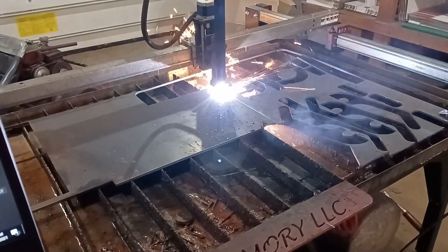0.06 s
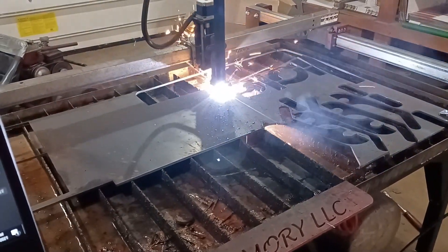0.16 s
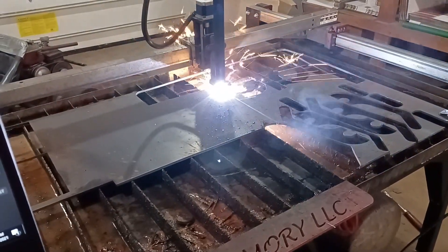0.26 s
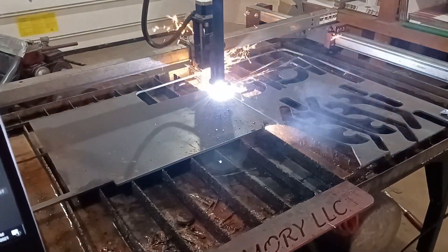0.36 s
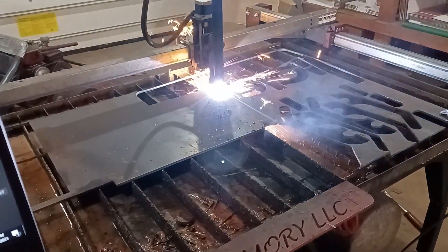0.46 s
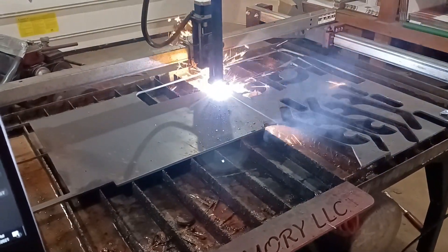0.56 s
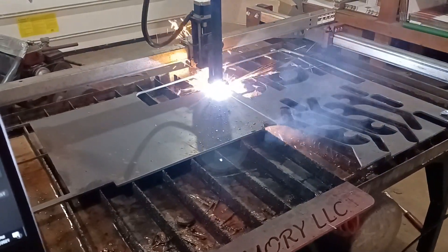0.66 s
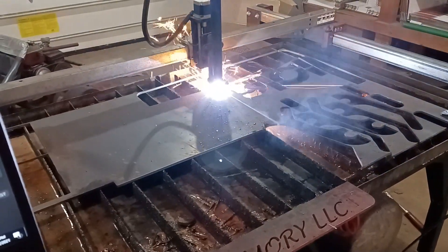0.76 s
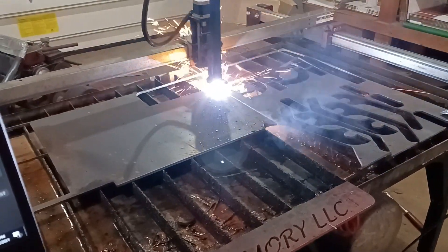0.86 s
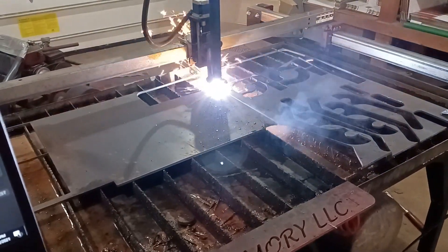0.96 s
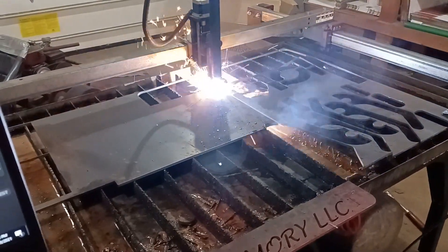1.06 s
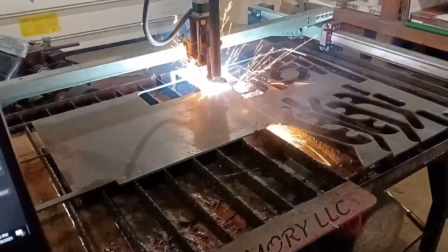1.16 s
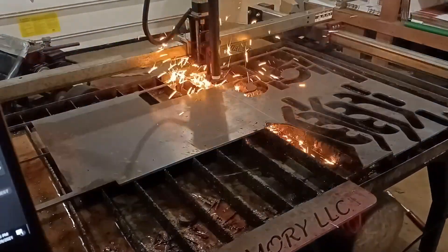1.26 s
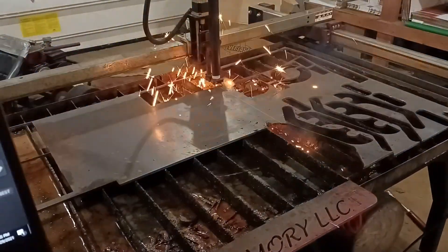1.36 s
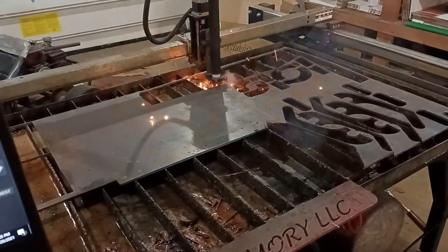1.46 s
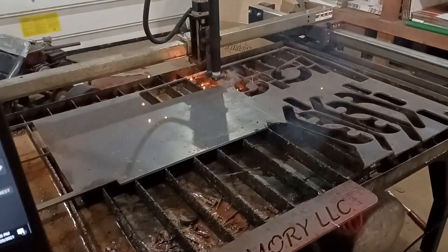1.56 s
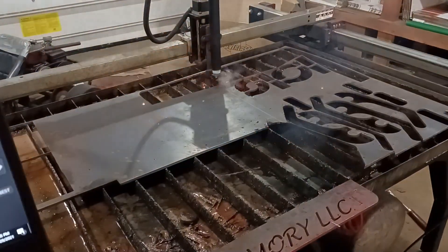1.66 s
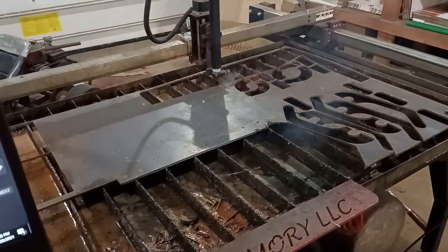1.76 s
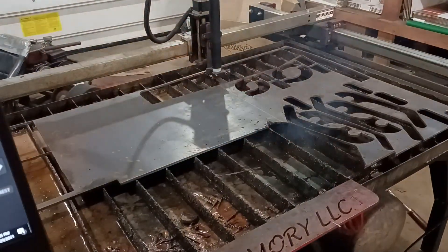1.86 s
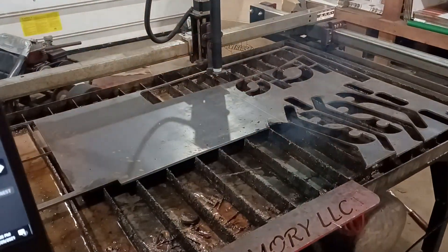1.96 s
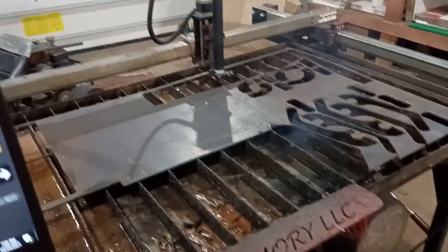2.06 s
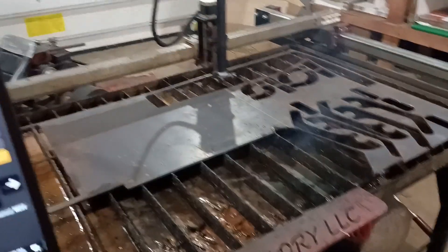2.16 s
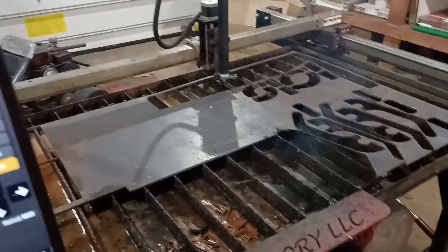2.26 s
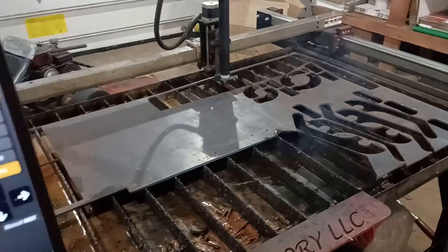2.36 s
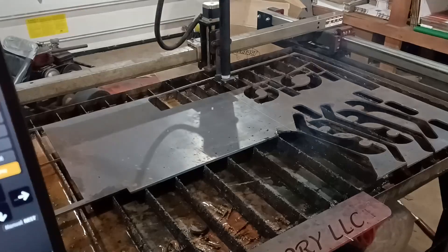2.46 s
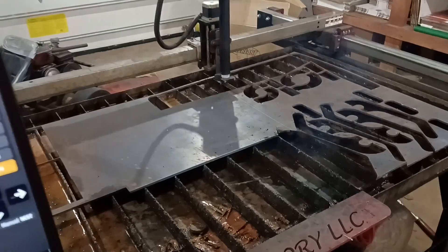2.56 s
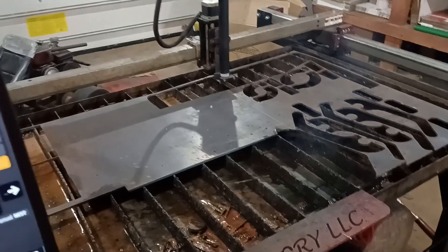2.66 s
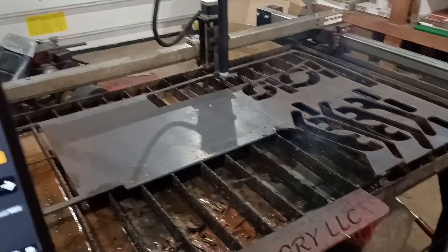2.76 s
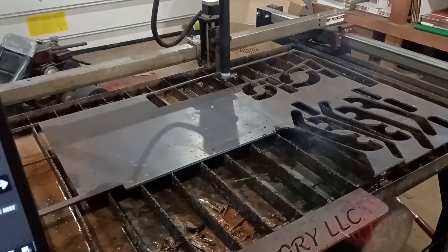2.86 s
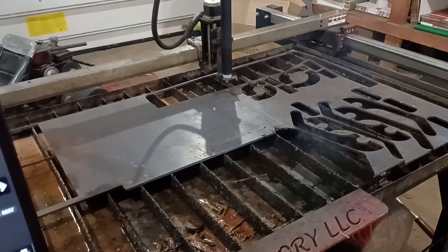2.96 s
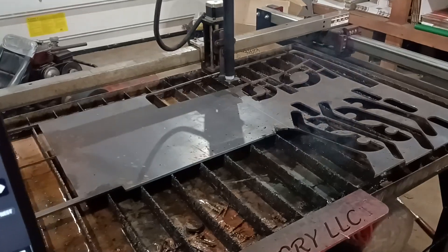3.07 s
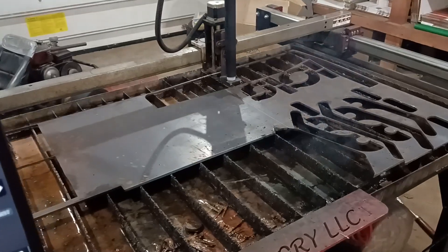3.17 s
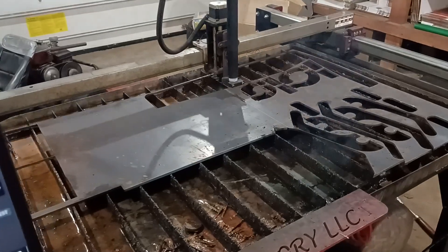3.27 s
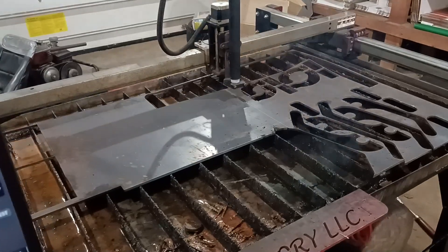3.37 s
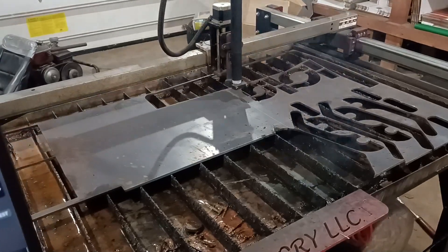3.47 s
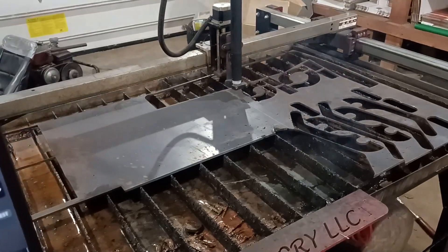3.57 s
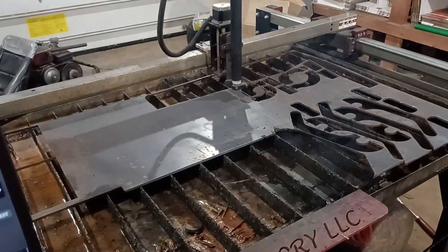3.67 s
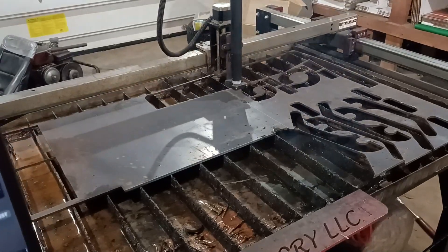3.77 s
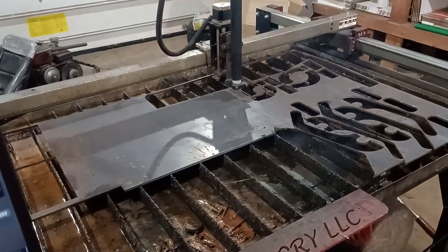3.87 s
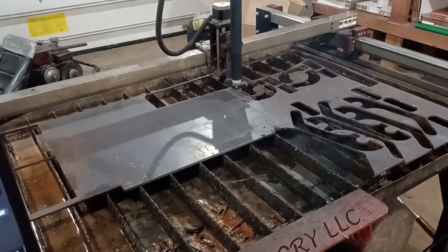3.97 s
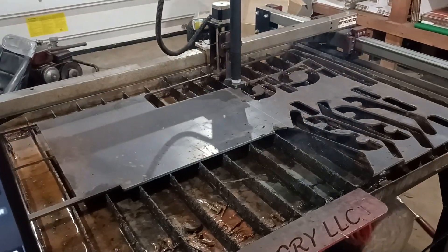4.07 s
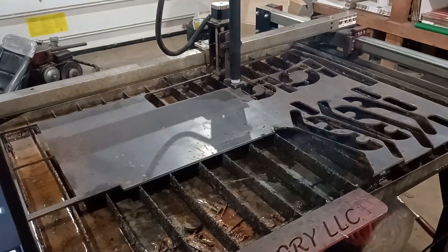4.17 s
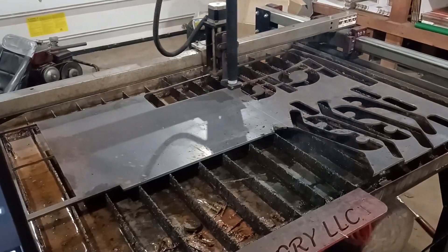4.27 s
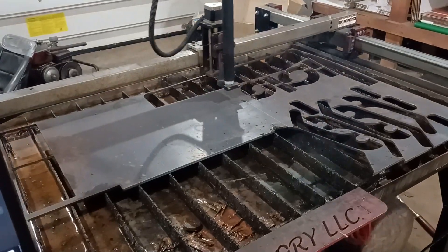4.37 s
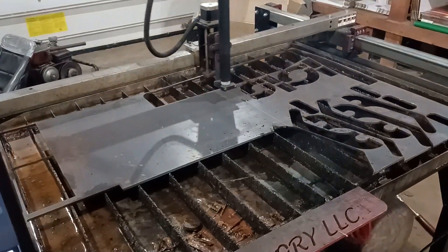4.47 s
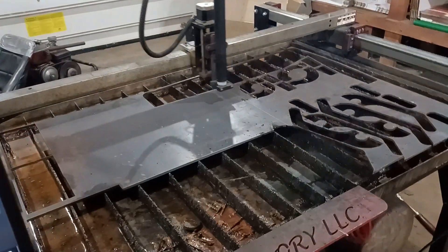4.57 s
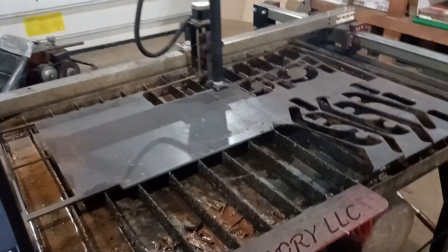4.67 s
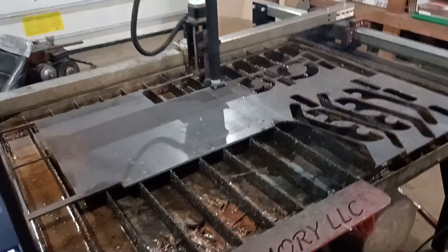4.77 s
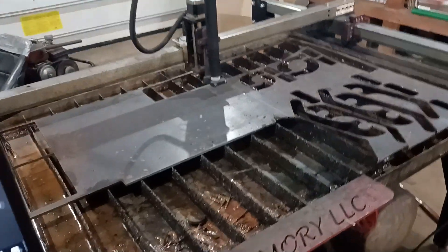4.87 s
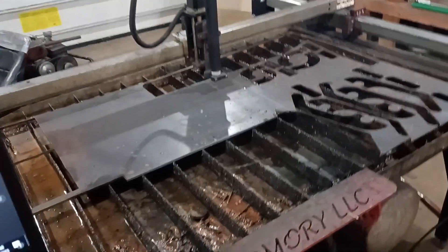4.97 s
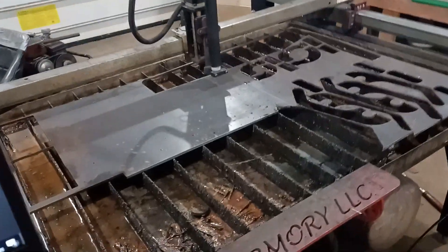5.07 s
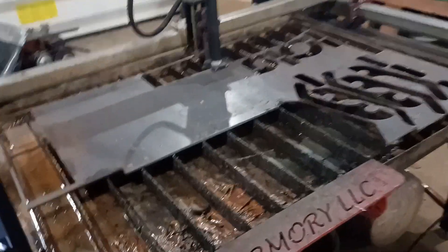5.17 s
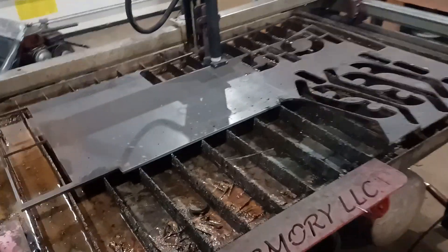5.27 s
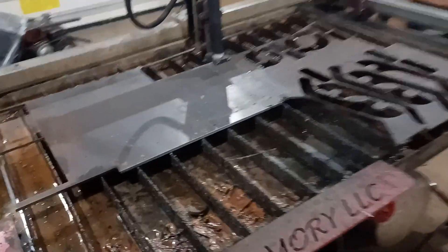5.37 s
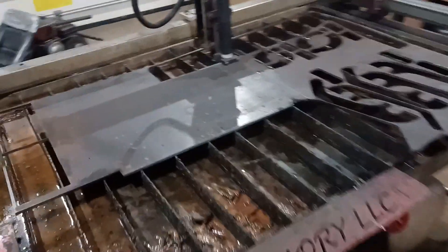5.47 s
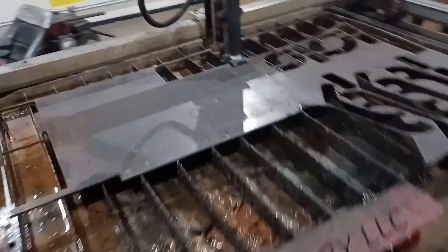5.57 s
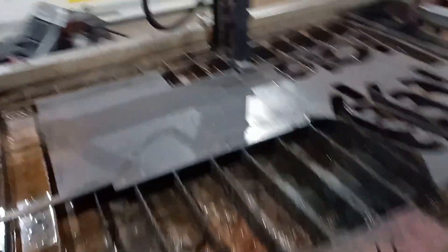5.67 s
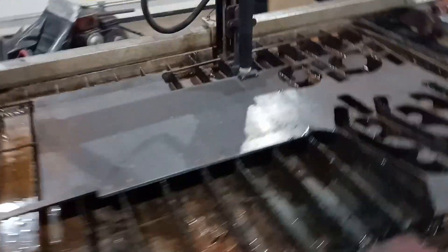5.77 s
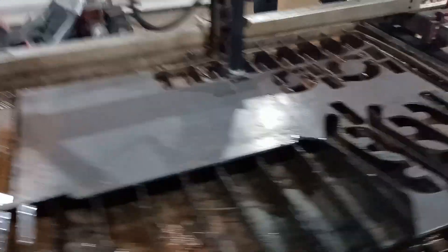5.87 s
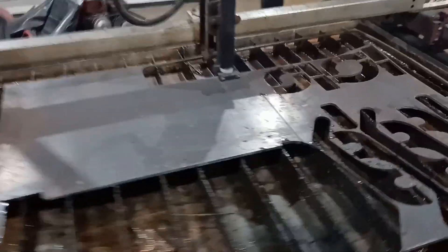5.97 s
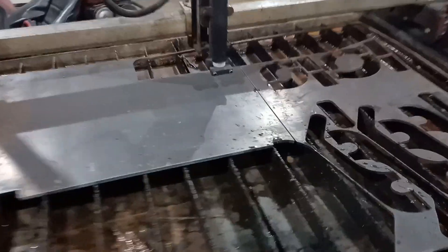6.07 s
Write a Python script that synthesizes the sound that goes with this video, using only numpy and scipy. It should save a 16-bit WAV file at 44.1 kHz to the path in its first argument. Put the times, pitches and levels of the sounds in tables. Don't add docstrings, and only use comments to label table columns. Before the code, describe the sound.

Fierce broad arc hiss on steel plate ends in a sharp pop and rattle, leaving steady cooling-air hiss, low fan drone and rumbling machine travel.

```python
import sys
import numpy as np
from scipy import signal
from scipy.fft import rfft, irfft, next_fast_len
from scipy.io import wavfile
from scipy.ndimage import uniform_filter1d

SR = 44100
rng = np.random.default_rng(int(sys.argv[2]) if len(sys.argv) > 2 else 0)


def volts(x):
    e = np.asarray(x, float) / 20
    return 10 ** e


def waveform_to_disk(signal):
    frames = np.transpose(np.atleast_2d(signal))
    scaled = np.clip(frames, -1, 1) * 32767
    samples = np.round(scaled).astype(np.int16)
    wavfile.write(sys.argv[1], SR, samples)


N = 269451
TIME = np.arange(N) / SR
BLOCK = 1024
HZ = np.maximum(np.fft.rfftfreq(BLOCK, 1 / SR), 10)[:, None]

# pitch_hz, level_db
RUMBLE_COLOUR = [(20, -34), (45, -35), (62, -32), (78, -26), (90, -15), (125, -9), (170, -3.5), (225, -1),
                 (290, -4.5), (335, -6), (400, -14.5), (460, -16.5), (560, -15), (900, -29)]
RUMBLE_DB, RUMBLE_ARC_DB, RUMBLE_TRAVERSE_DB = -41, 1.5, 0.75
BLADE_HZ, LOADED_BLADE_HZ, SPIN_UP_S = 270.0, 267.4, .2
BLADE_DB, BLADE_WAVER_DB = -31.5, 1
SAG_S, SAG_LENGTH_S, SAG_DB = 1.154, 0.032, -8

# pitch_hz, width_hz, lift_db
ROOM_RINGS = [(535, 34, 2), (914, 9.7, -1), (970, 7.3, 0), (1142, 11, 3), (1400, 34, 2.5), (1626, 16, 2.5),
              (1840, 19, 3.5)]
ROOM_T60_S, ROOM_DB = 0.26, -7

# start_s, end_s, pitch_hz, level_db, swell_db (change by the end)
WHINES = [
    (.76, 1.19, 1790, -45.5, 6),
    (4.31, 4.82, 1991, -45, 1.5),
    (3.0, 6.0, 157, -45, -2),
]
FLUTTER_HZ, FLUTTER_CREST_S = 20.2, 4.738

# time_s, length_s, pitch_hz, glide_hz_per_s, level_db
JOLTS = [
    (1.15, 0.027, 2600, 0, -34),
    (1.17, 0.035, 4620, 0, -28.5),
    (1.699, 0.093, 1650, -1, -48),
    (2.866, 0.097, 1306, 3996, -38),
    (2.906, 0.027, 3720, 0, -39),
    (4.213, .04, 2760, 0, -41),
    (4.785, .018, 1616, -14000, -43),
]
JOLT_WIDTH_SHARE = 0.23

# start_s, end_s, roar_db, upper_db (upper frame rings, relative)
MOVES = [
    (1.21, 1.955, -42.5, -1.5),
    (1.5, 3.097, -36, -18.5),
    (2.794, 4.592, -35.5, -5.5),
]
SPEED_UP_S, SLOW_DOWN_S, MOVE_SWELL_DB_PER_S = 0.17, 0.35, 1.1
KICK_S, KICK_LENGTH_S, KICK_DB = 2.875, 0.031, 8
# pitch_hz, width_hz, level_db
FRAME_LOWER = [(903, 280, 2.5), (1150, 59, 3.5), (1456, 58, 0.5), (1650, 180, 2.5), (1840, 440, -5.5)]
FRAME_UPPER = [(2600, 670, 0), (2740, 83, -1), (3930, 370, -3)]

# time_s, strength_db, facing (how squarely the microphones face it, about 0-1)
AIR = [(1.2, 3, 0), (1.35, -2.5, 0.6), (1.7, -0.6, 0.36), (2.1, -1, .8), (2.4, -0.5, 0.94), (2.65, 0, 1.05),
       (2.9, 0, .6), (3.5, 0.1, 1), (4.2, 0.1, .9), (4.7, -1.5, 0.45), (5.15, -3, 1.1), (5.3, -.6, .3),
       (5.7, 1.5, 1), (5.85, 0.8, .8), (5.95, 3.5, 0.9), (6.11, 2.2, .8)]
# pitch_hz, level_db
AIR_COLOUR = [(150, -44), (550, -9), (1500, -12.5), (3000, -9.5), (4200, -6.5), (5800, -3), (7000, -1),
              (7600, -5), (8200, -8.5), (9500, -9), (10500, -9), (12000, -6), (13500, -4), (15800, -4.5)]
JET_DB, TOP_DB = -33.5, 5
NOZZLE_HZ, SLIDE_FROM_S, SLIDE_HZ_PER_S = 7050, 5.7, -2600
BOOST_DB, BOOST_PER_DB = 1.4, 1.47

# time_s, level_db
ARC = [
    (0, -27),
    (.4, -25.5),
    (.85, -27.5),
    (.97, -25),
    (1.12, -24.5),
    (1.14, -21.5),
    (1.2, -25.5),
    (1.26, -31.5),
    (1.34, -43),
]
# pitch_hz, level_db
ARC_COLOUR = [(150, -18), (500, -10), (1000, -6.5), (1400, -9), (2100, -9), (3000, -5.5), (4500, -5),
              (5800, -4.5), (7300, -7), (7900, -11.5), (10000, -9), (10700, -5), (12200, -2), (15800, -1.5)]
SIZZLE_DB, SIZZLE_PER_DB = 0.5, -0.07

POP_S, POP_DB, THUMP_DB, POP_TAIL_DB = 1.1920, -8.5, -13.5, -22.5
# pitch_hz, level_db
POP_TAIL_COLOUR = [(24, -46), (40, -29), (112, 0), (376, 0.5), (733, -6), (1130, -6), (1510, -12),
                   (2170, -7.5), (3000, -24), (3900, -47), (6600, -120)]

# pitch_hz, likeness (0-1)
LIKENESS = [(25, 0.4), (70, 0.97), (130, 0.95), (300, 0.86), (550, 0.45), (1000, 0.38), (2700, 0.43),
            (5300, 0.47), (7200, 0.55), (8300, 0.55), (9700, 0.05), (12000, 0.5), (13300, 0.25),
            (15000, 0.3)]
# pitch_hz, difference_db
LEAN = [(60, 0.5), (600, -0.4), (1400, 2.5), (2000, 0.5), (2500, 2.5), (4000, -1.5), (5500, -2.1),
        (7000, 1), (8500, 0), (9500, -2.5), (11500, -4.5), (13300, -5), (14300, -.6), (16000, -1.1)]
# time_s, right_lag_us (right microphone's delay in microseconds)
LAG = [
    (0, 30),
    (1.1, 30),
    (1.9, 22),
    (3.0, 9),
    (4.2, 9),
    (4.7, 45),
    (5.3, 50),
    (5.6, -5),
    (6.11, -8),
]
DUCK_DB, RECOVER_FROM_S, RECOVER_TO_S = -6, 2.31, 2.8
TOP_CUT_HZ = 15745


def columns(rows, t):
    s, *values = np.transpose(rows)
    return [np.interp(t, s, v) for v in values]


def at_hz(points, wanted_hz=HZ):
    hz, value = np.transpose(points)
    return np.interp(np.log(wanted_hz), np.log(np.maximum(hz, 10)), value)


def gate(start, end, rise, fall):
    return np.clip((TIME - start) / rise, 0, 1) * np.clip((end - TIME) / fall, 0, 1)


def bump(t, centre, length):
    return np.exp(-.5 * ((t - centre) / length) ** 2)


def drift(per_s, rows=1):
    width = max(1, round(SR / 256 / per_s / 2))
    white = rng.standard_normal((rows, N // 256 + 200))
    smooth = uniform_filter1d(uniform_filter1d(white, width), width)[:, 100:]
    return smooth / smooth.std()


def wobble(per_s):
    return np.interp(np.arange(N) / 256, np.arange(N // 256 + 100), drift(per_s)[0])


def rings(table):
    return sum(volts(2 * db) / (1 + (2 * (HZ - hz) / width) ** 2) for hz, width, db in table)


def air_noise(power, low_hz, high_hz, gust_db, patch_db, direct=1.0):
    white = rng.standard_normal((3, N))
    _, t, (shared, left, right) = signal.stft(white, SR, nperseg=BLOCK, noverlap=768)
    shape = np.sqrt(power(t)) * np.ones(shared.shape)
    inside = (HZ[:, 0] > low_hz) & (HZ[:, 0] < high_hz)
    shape = shape / np.sqrt(np.sum(shape[inside] ** 2, 0) / len(HZ))
    band = (3 * np.log2(HZ[:, 0] / 10)).astype(int)
    flicker = gust_db * drift(8.7) + patch_db * drift(10, rows=40)[band]
    alike = np.clip(direct * at_hz(LIKENESS), 0, .99)
    lean = volts(at_hz(LEAN) / 2)
    late = np.exp(-2j * np.pi * HZ * columns(LAG, t)[0] * 1e-6)
    shape = shape * volts(flicker[:, :len(t)]) * np.sqrt(2 / (1 + alike * late.real))
    shared, diffuse = np.sqrt(alike) * shared, np.sqrt(1 - alike)
    left = shape * lean * (shared + diffuse * left)
    right = shape / lean * (shared * late + diffuse * right)
    return signal.istft(np.array([left, right]), SR, nperseg=BLOCK, noverlap=768)[1][:, :N]


def moving(t, start, end):
    return np.clip((t - start) / SPEED_UP_S, 0, 1) * np.clip((end - t) / SLOW_DOWN_S, 0, 1) ** 2


def workshop(x):
    size = next_fast_len(N + SR)
    hz = np.fft.rfftfreq(size, 1 / SR)
    t = np.arange(SR // 2) / SR
    echoes = rng.standard_normal(len(t)) * volts(-60 * t / ROOM_T60_S) * (t > .004)
    echoes = echoes / np.linalg.norm(echoes)
    response = 1 + volts(ROOM_DB) * rfft(echoes, size) / (1 + hz / 6000)
    lift_db = sum(db / (1 + (2 * (hz - ring_hz) / width) ** 2) for ring_hz, width, db in ROOM_RINGS)
    return irfft(rfft(x, size) * response * volts(lift_db - 0.6), size)[:, :N]


def fan():
    flat = air_noise(lambda t: 1 / (1 + (HZ / 1200) ** 6), 90, 240, 0.74, 0.63)
    hz = np.maximum(np.fft.rfftfreq(N + 1, 1 / SR), 1)
    colour = volts(at_hz(RUMBLE_COLOUR, hz) + 5.0)
    traverse_start, traverse_end = MOVES[-1][:2]
    level_db = RUMBLE_DB + RUMBLE_ARC_DB * gate(-1, 1.4, .01, 0.23)
    level_db = level_db + RUMBLE_TRAVERSE_DB * moving(TIME, traverse_start, traverse_end)
    return volts(level_db) * irfft(rfft(flat, N + 1) * colour, N + 1)[:, :N]


def fan_tone():
    spin_up = np.exp(-np.maximum(TIME - SAG_S, 0) / SPIN_UP_S)
    hz = BLADE_HZ + (LOADED_BLADE_HZ - BLADE_HZ) * spin_up
    phase = 2 * np.pi * np.cumsum(hz + 0.325 * wobble(7.9)) / SR
    level_db = BLADE_DB + SAG_DB * bump(TIME, SAG_S, SAG_LENGTH_S) + BLADE_WAVER_DB * wobble(6.3)
    tone = np.sqrt(2) * volts(level_db) * (np.sin(phase) + volts(-31) * np.sin(2 * phase))
    return tone * volts([[.55], [-.55]])


def motors():
    out = np.zeros(N)
    for start, end, hz, db, swell_db in WHINES:
        progress = (TIME - start) / (end - start)
        flutter_phase = 2 * np.pi * FLUTTER_HZ * (TIME - FLUTTER_CREST_S) + .25 * wobble(4)
        flutter = 1 + .7 * np.clip(progress, .6, 1) * np.cos(flutter_phase)
        phase = 2 * np.pi * np.cumsum(hz * (1 + .0015 * wobble(9))) / SR
        level_db = db + 3 + swell_db * progress + 1.2 * wobble(6)
        out += volts(level_db) * gate(start, end, .025, .04) * flutter * np.sin(phase)
    return out


def jolts():
    out = 0
    for s, length, hz, glide, db in JOLTS:
        start, end = int(s * SR) - SR // 6, int(s * SR) + SR // 6
        t = TIME[start:end] - s
        low_pass = signal.butter(2, JOLT_WIDTH_SHARE * hz / 2, fs=SR, output="sos")
        band = signal.sosfilt(low_pass, rng.standard_normal((2, len(t))))
        phase = 2 * np.pi * (hz * t + glide * t ** 2 / 2)
        rattle = (band[0] * np.cos(phase) + band[1] * np.sin(phase)) / band.std()
        out = out + np.pad(volts(db) * bump(t, 0, length) * rattle, (start, N - end))
    return out * volts([[2.5], [-3.5]])


def gantry():
    def roar(t, upper):
        total = 1e-9
        for start, end, db, upper_db in MOVES:
            level_db = db + upper * upper_db + MOVE_SWELL_DB_PER_S * (t - start)
            total = total + moving(t, start, end) ** 2 * volts(2 * level_db)
        return total

    def power(t):
        no_bass = 1 / (1 + (750 / HZ) ** 8)
        upper_share = volts(10) * roar(t, 0.82) / roar(t, 0)
        return no_bass * (rings(FRAME_LOWER) + upper_share * rings(FRAME_UPPER))

    kick = volts(-1.22 + KICK_DB * bump(TIME, KICK_S, KICK_LENGTH_S))
    level = kick * gate(MOVES[0][0], MOVES[-1][1], .01, .01) * np.sqrt(roar(TIME, 0))
    return level * air_noise(power, 800, 1920, 0.16, 1.26, direct=1.4)


def cooling_air():
    def power(t):
        strength_db, facing = columns(AIR, t)
        treble_db = TOP_DB * facing * np.clip((HZ - 10000) / 1800, 0, 1)
        nozzle_hz = NOZZLE_HZ + SLIDE_HZ_PER_S * np.maximum(t - SLIDE_FROM_S, 0)
        bands = sum(1 / (1 + ((HZ - k * nozzle_hz) / 650) ** 2) for k in (1, 1.76))
        boost_db = (BOOST_DB + BOOST_PER_DB * strength_db) * bands
        return volts(2 * (at_hz(AIR_COLOUR) + treble_db + boost_db))

    level = volts(JET_DB + columns(AIR, TIME)[0]) * gate(1.11, 7, .12, .01)
    return level * air_noise(power, 4470, 7500, 0.24, 0.41)


def arc():
    def power(t):
        above_usual_db = np.clip(columns(ARC, t)[0] + 26, -3, 5)
        sizzle_db = (SIZZLE_DB + SIZZLE_PER_DB * above_usual_db) * (HZ > 10000)
        return volts(2 * (at_hz(ARC_COLOUR) + sizzle_db))

    level = volts(columns(ARC, TIME)[0]) * gate(-1, 1.67, .01, 0.1)
    return level * air_noise(power, 2500, 8300, 0.7, 0.73, direct=0.78)


def pop():
    after = np.maximum(TIME - POP_S, 0)
    pulse = -np.sin(2 * np.pi * after / .0013) * (after < .0013)
    later = np.maximum(after - .0003, 0)
    thump = np.sin(2 * np.pi * 225 * later) * np.exp(-later / .009)
    blow = volts(POP_DB) * pulse * volts([[-1.5], [1.5]]) + volts(THUMP_DB) * thump
    echo = volts(-9.5) * np.roll(uniform_filter1d(blow, size=30), int(0.043 * SR), axis=1)

    def power(t):
        return volts(2 * at_hz(POP_TAIL_COLOUR)) / (1 + (HZ / 2500) ** 4)

    dying = gate(POP_S - .008, 1.45, .01, .17) * np.exp(-after / .12)
    tail = volts(POP_TAIL_DB) * dying * air_noise(power, 60, 2300, 0.51, 0.62, direct=0.77)
    no_bass = signal.butter(2, 75, "high", fs=SR, output="sos")
    return signal.sosfilt(no_bass, blow + echo + tail)


def scene():
    steady = fan() + jolts() + gantry() + cooling_air() + arc()
    return workshop(steady) + fan_tone() + motors() + pop()


def roll_off(x):
    return signal.sosfilt(signal.butter(12, 17040, fs=SR, output="sos"), x)


def record(dry):
    gain = volts(np.interp(TIME, [RECOVER_FROM_S, RECOVER_TO_S], [DUCK_DB, 0]))
    hz = np.fft.rfftfreq(N + 1, 1 / SR)
    passed = (hz < TOP_CUT_HZ) / np.sqrt(1 + (30 / np.maximum(hz, 1)) ** 4)
    mix = irfft(rfft(dry * gain, N + 1) * passed, N + 1)[:, :N]
    return roll_off(mix)


dry = scene()
out = record(dry)
waveform_to_disk(out)
```